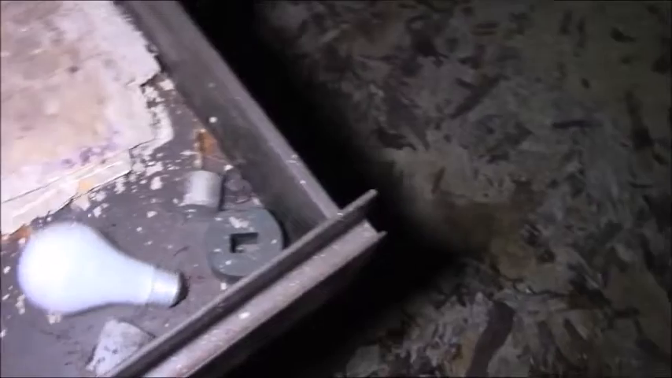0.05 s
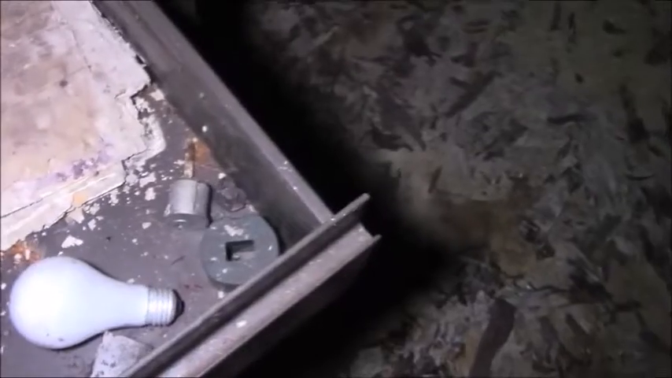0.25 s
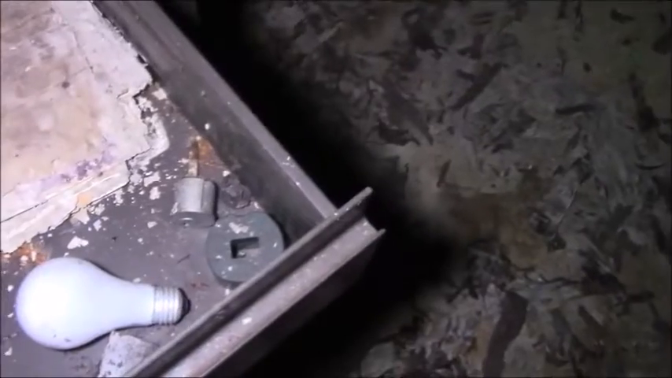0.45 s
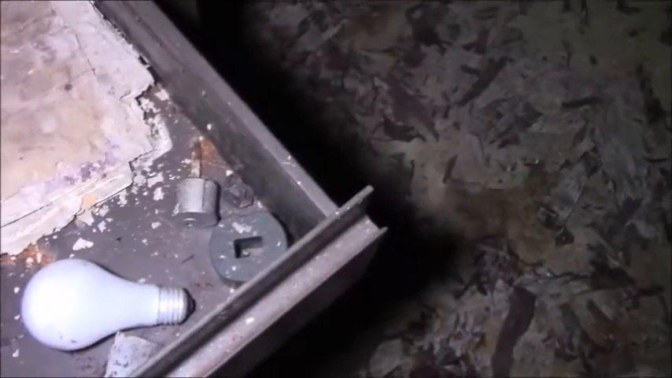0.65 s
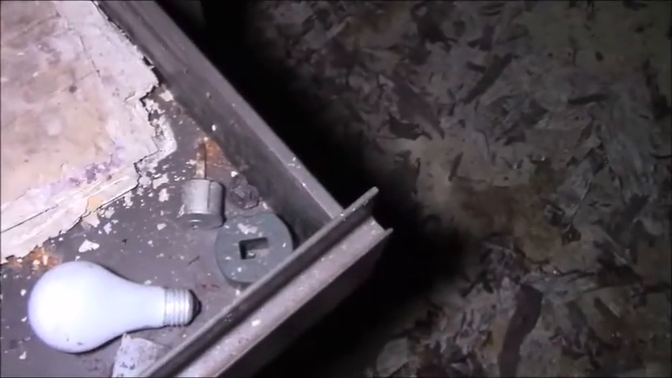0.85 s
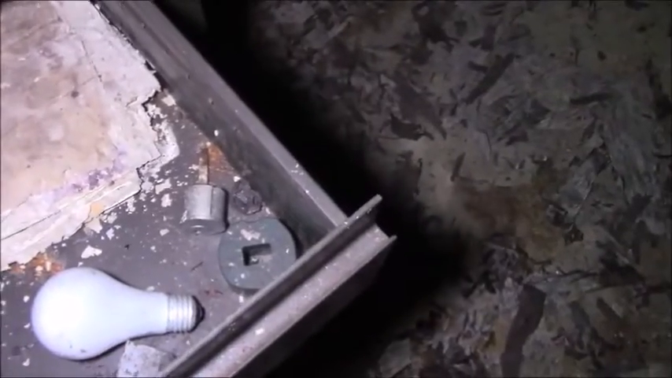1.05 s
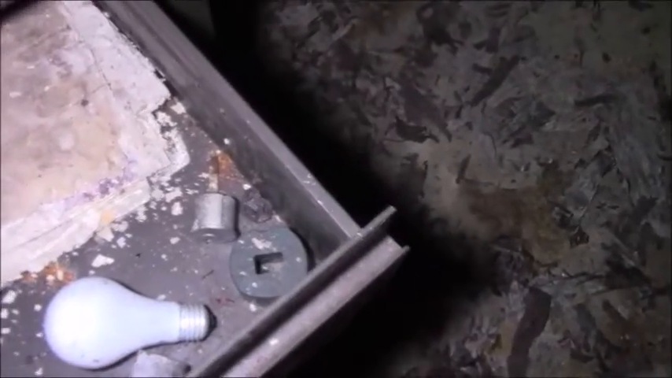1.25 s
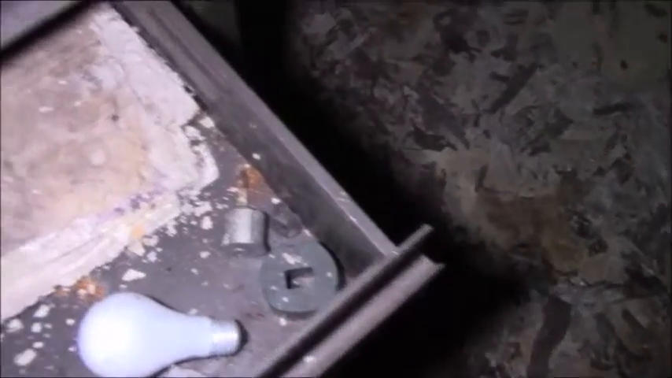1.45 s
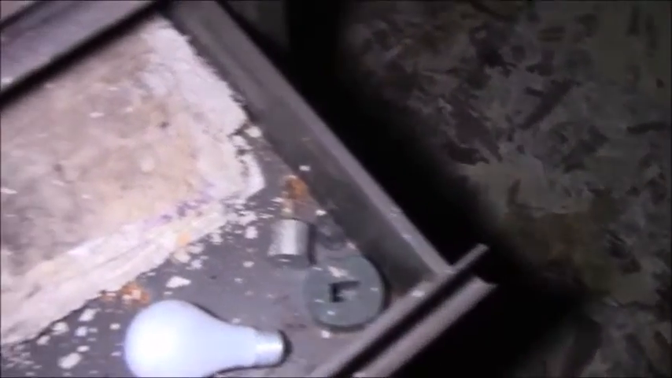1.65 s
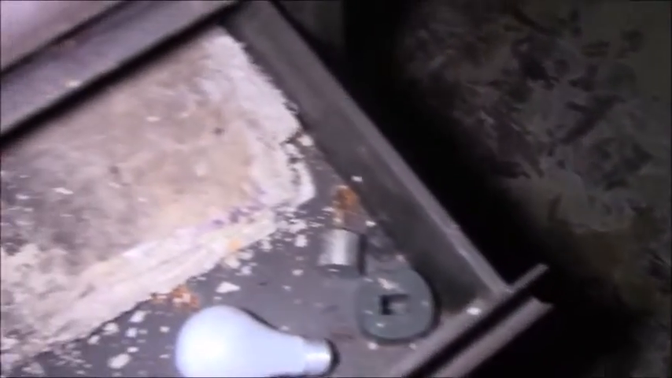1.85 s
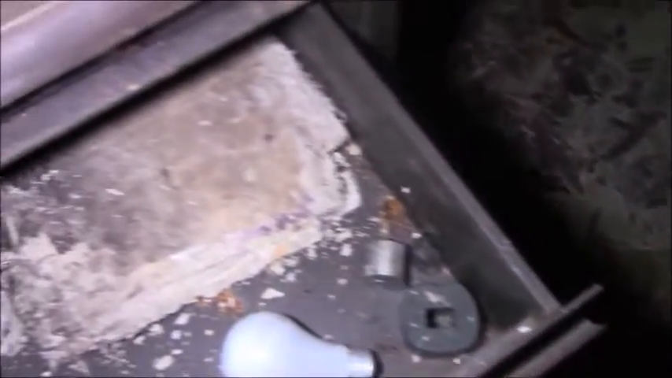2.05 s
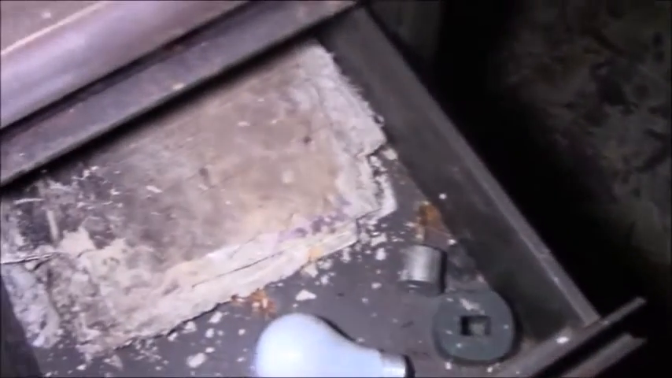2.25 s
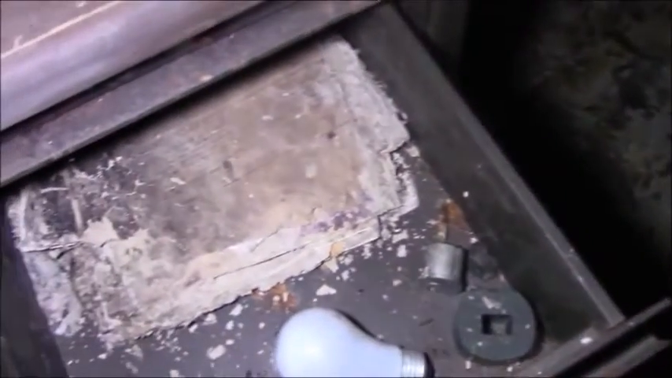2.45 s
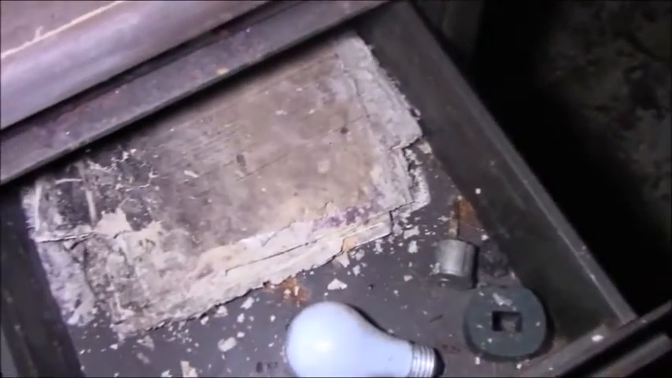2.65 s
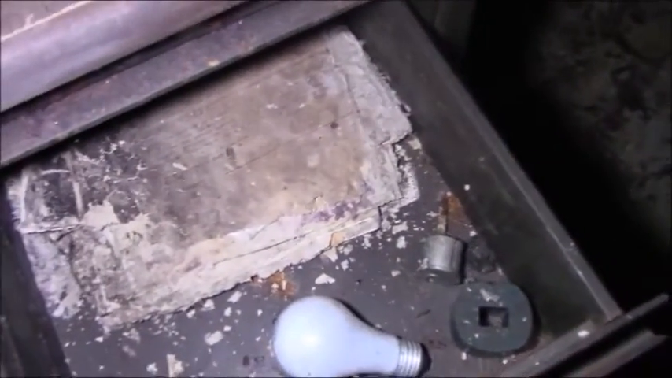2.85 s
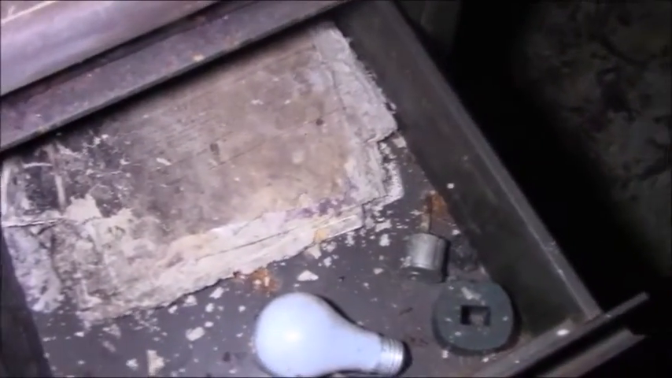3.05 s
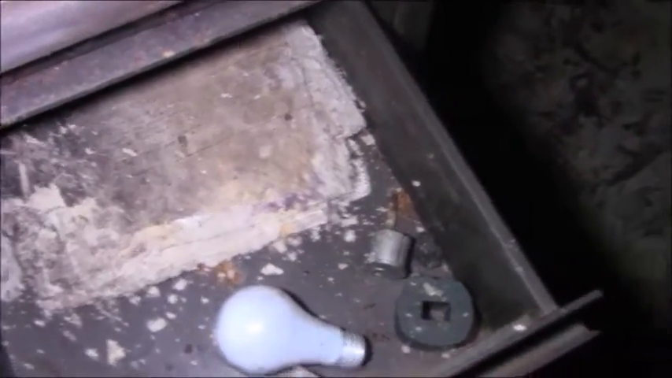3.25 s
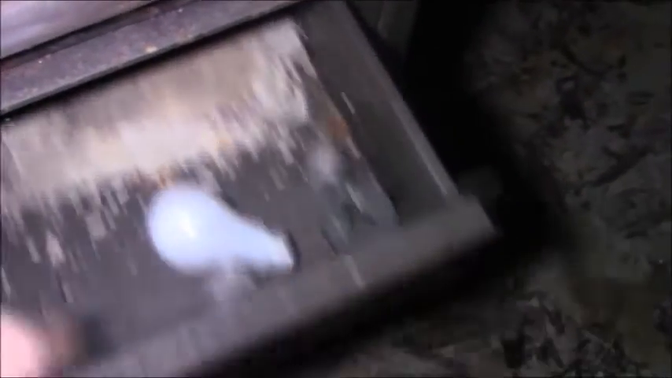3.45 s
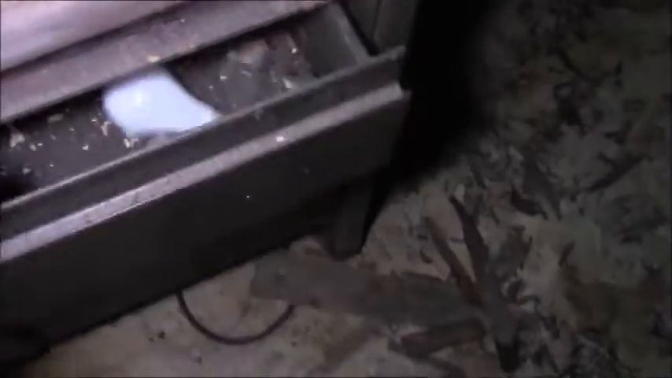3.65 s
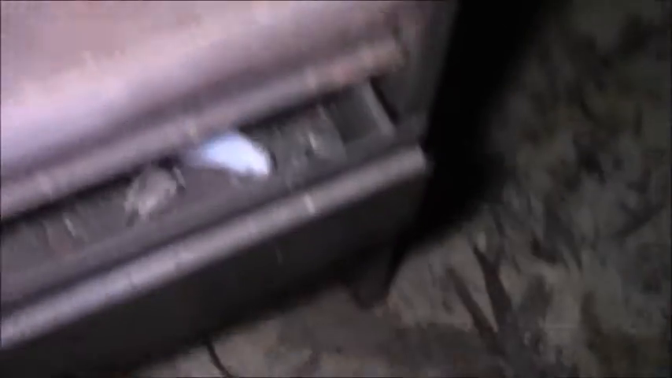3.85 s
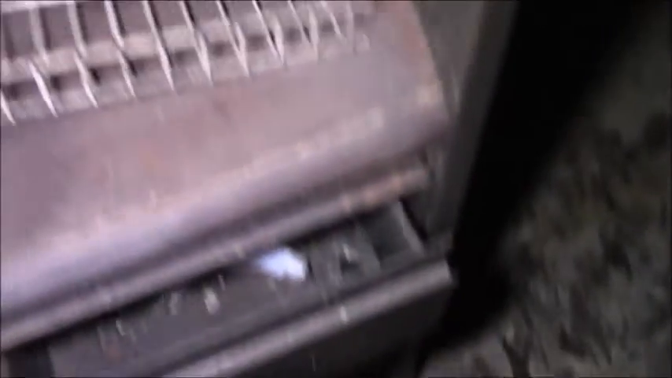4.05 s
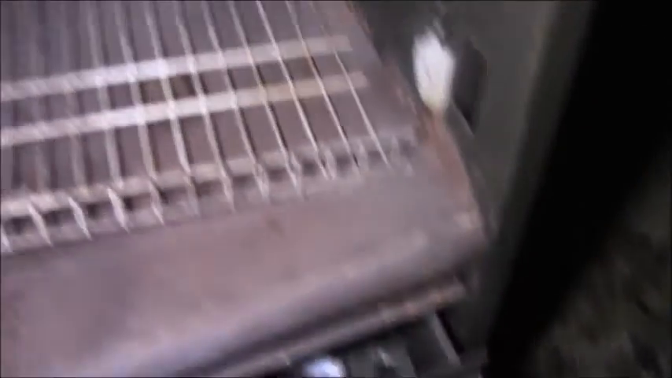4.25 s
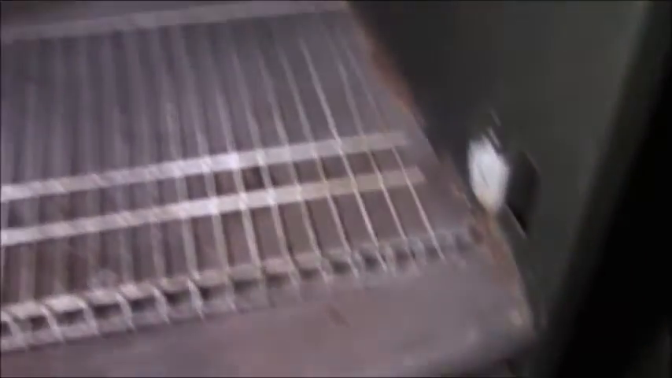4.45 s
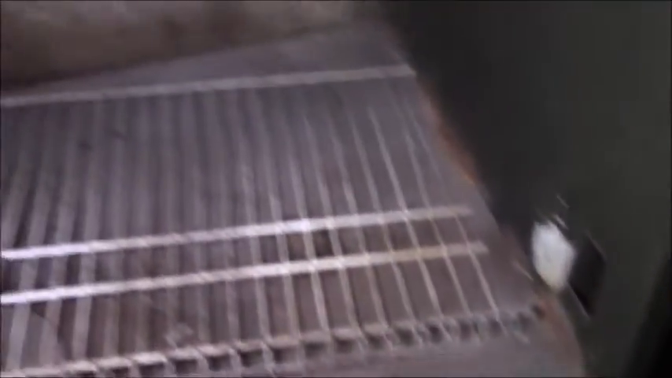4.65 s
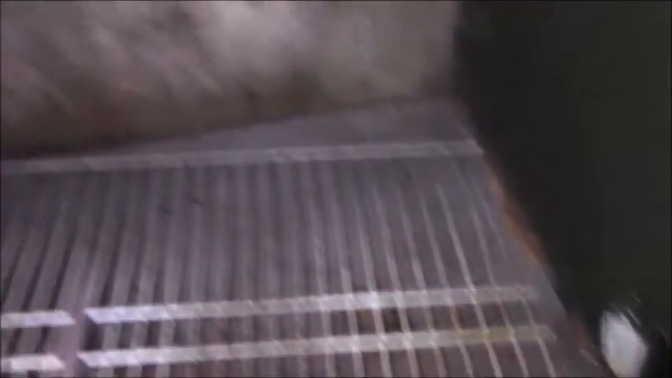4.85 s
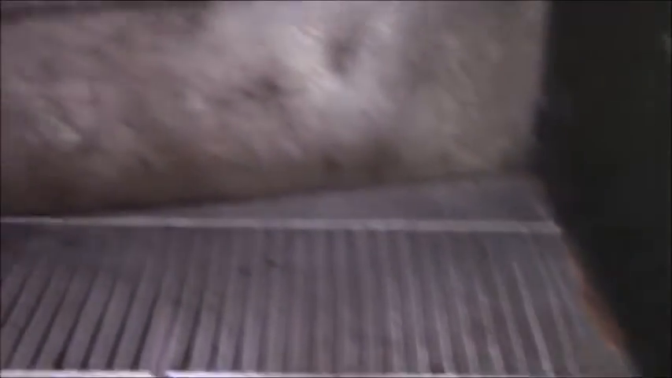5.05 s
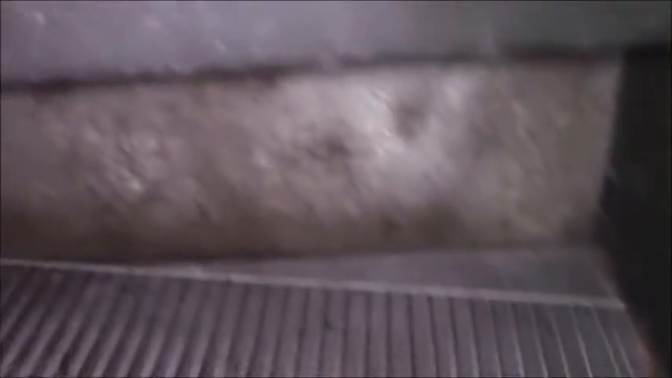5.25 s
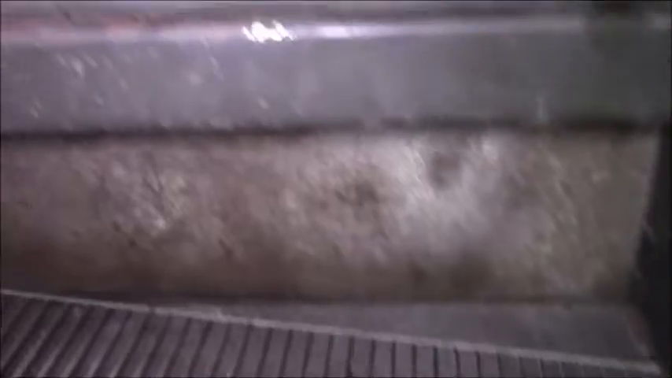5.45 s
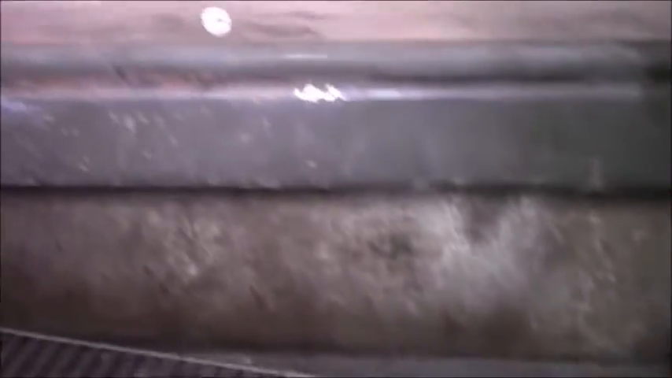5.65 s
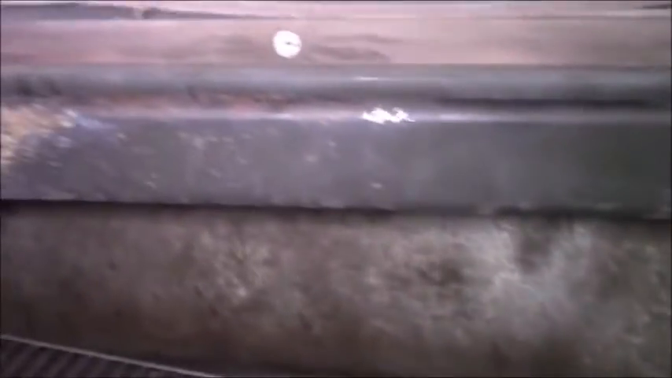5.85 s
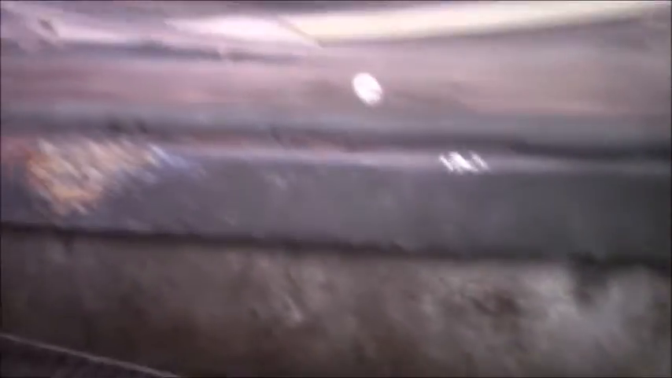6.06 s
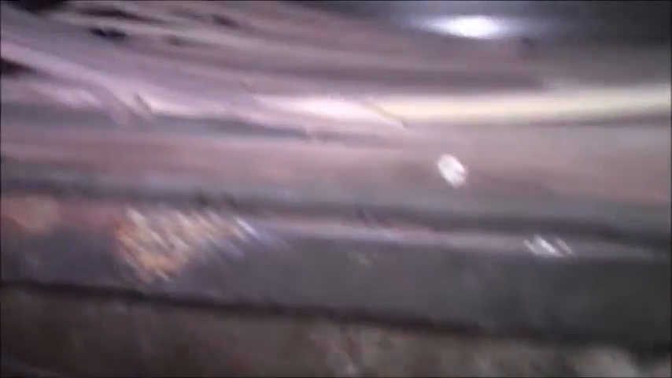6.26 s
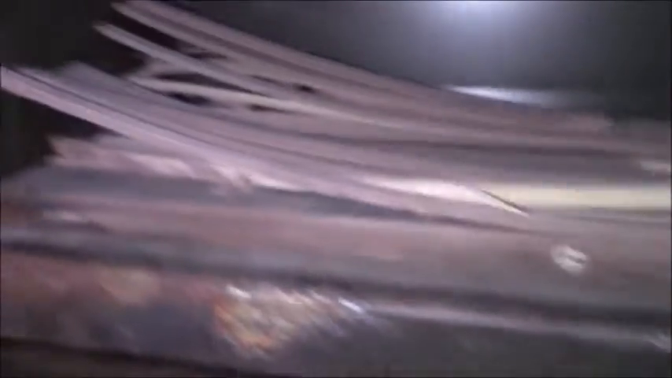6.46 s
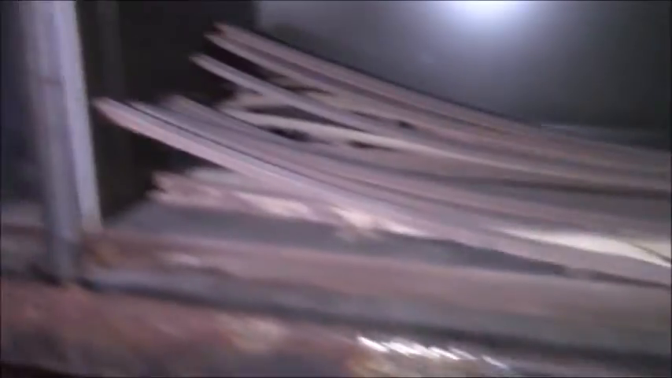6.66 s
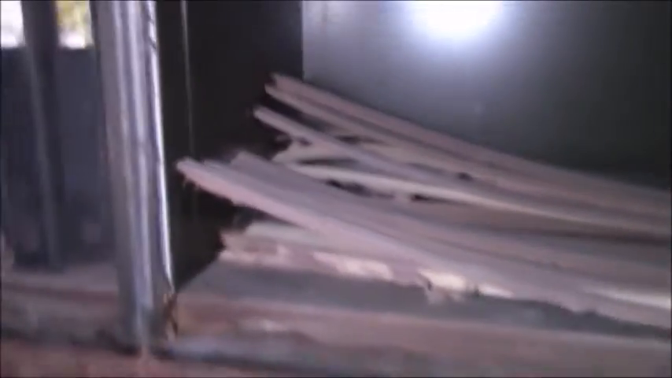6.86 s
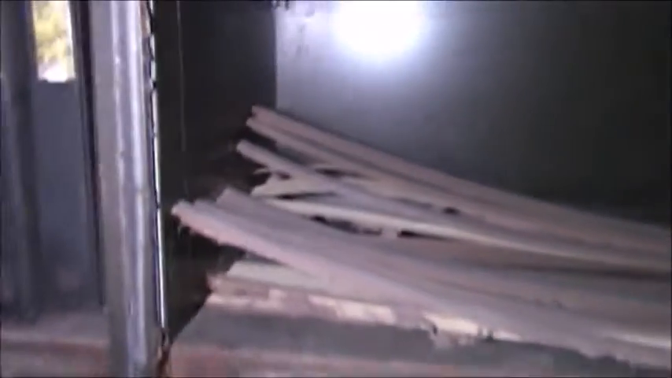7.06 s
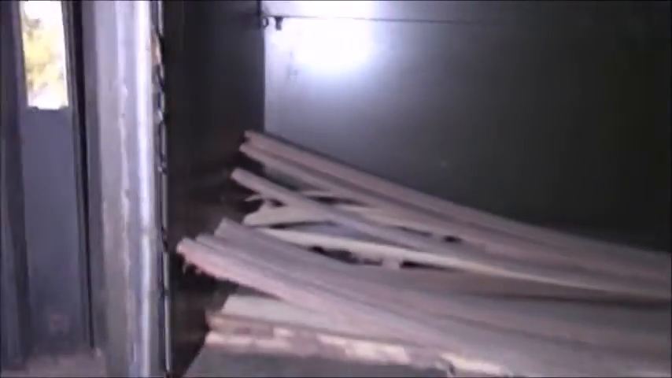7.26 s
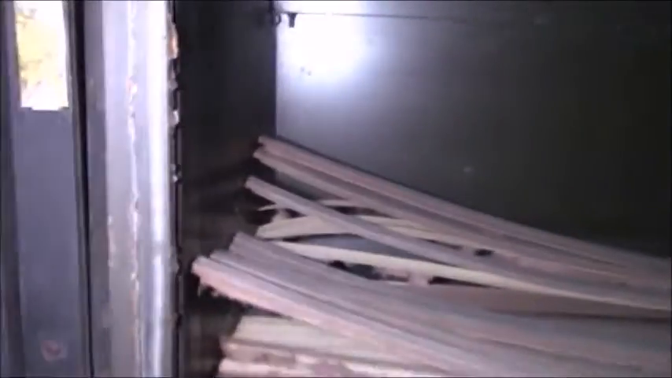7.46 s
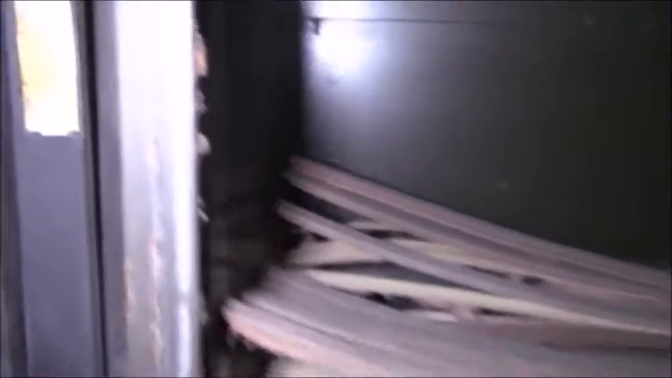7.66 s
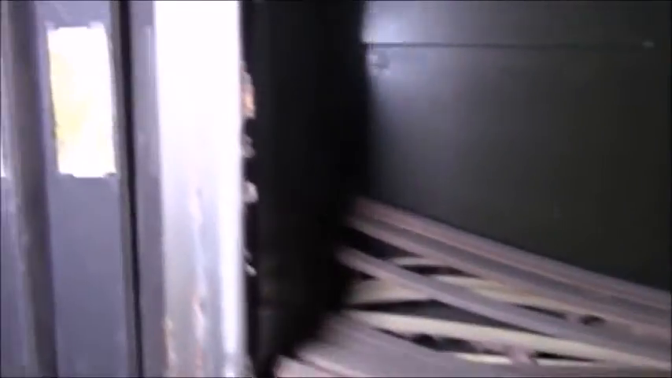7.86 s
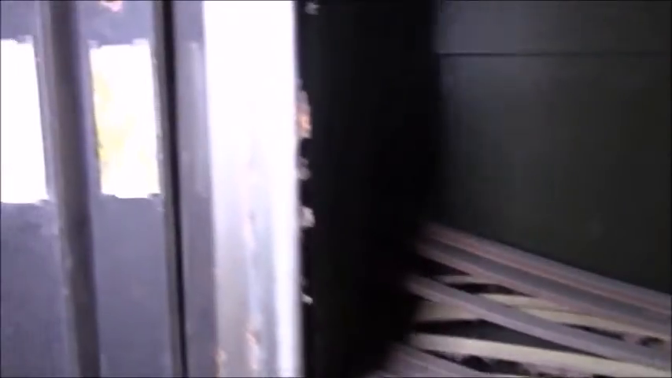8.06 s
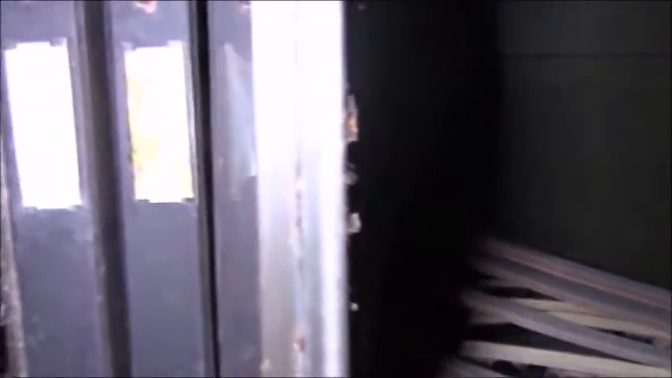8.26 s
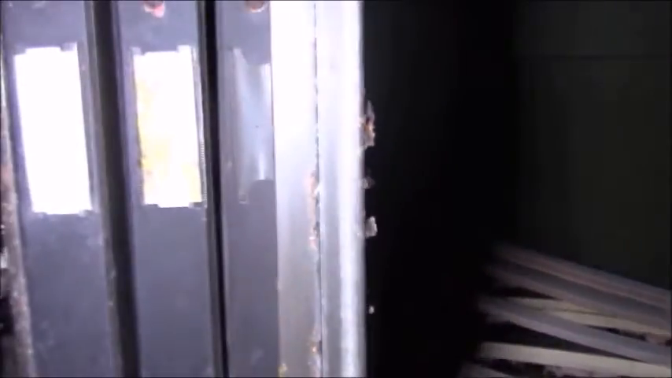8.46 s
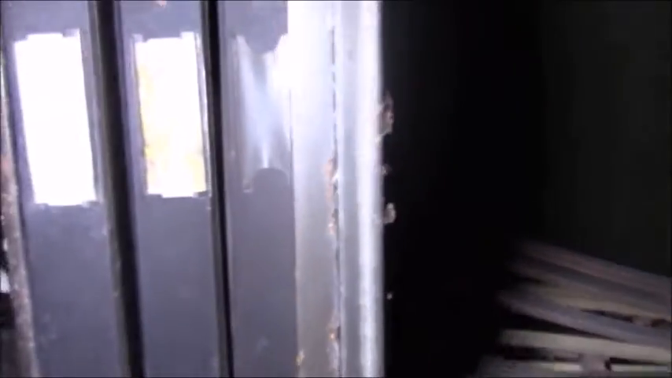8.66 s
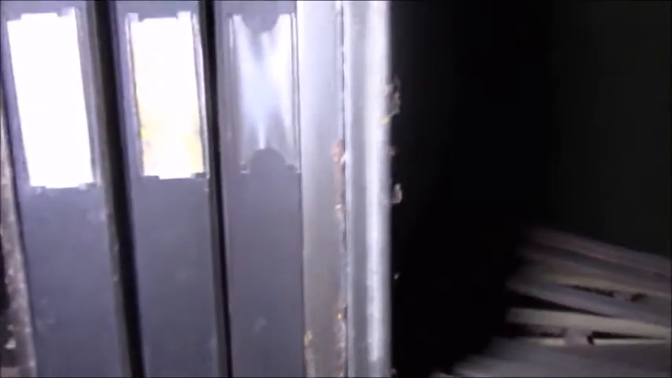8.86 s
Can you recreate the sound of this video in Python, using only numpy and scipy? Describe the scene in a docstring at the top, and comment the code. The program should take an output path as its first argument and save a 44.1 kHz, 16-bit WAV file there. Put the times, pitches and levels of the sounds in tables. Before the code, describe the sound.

In an empty, lightly reverberant workshop, old metal drawers are handled at close range: soft knocks first, then a loud grinding shove with clattering and a clink, sharp little ticks, and a second rough scrape. Shoes and clothing rustle over gritty floor. A steel door scrapes along and slams with a low boom and quick rebound, leaving shuffling and a final grit snap over steady hush.

```python
"""A knock and a faint rub of rusty runners open the scene: drawers of a sheet-steel cabinet are worked close
by. Four strokes grind and the cabinet rocks on after one of them (random grains drive panel modes); drawers and
a shoe thump, a loose steel part clinks, a sliding door slams and rebounds (decaying modes and noise). Shoes and
clothes shuffle over a gritty floor (softer grains in swelling bands); thin squeaks (gliding sines), a dull
clack, a pinging wire and snapping grit (noise bursts) join them. An empty workshop adds its echo and room
noise; two faint steady high tones sound throughout."""
import sys
import numpy as np
from scipy import signal
from scipy.fft import rfft, irfft, next_fast_len
from scipy.io import wavfile
from scipy.ndimage import map_coordinates

SR = 44100
rng = np.random.default_rng(int(sys.argv[2]) if len(sys.argv) > 2 else 0)


def to_wav(sig):
    """Store sig (one row per channel, or 1-D mono) as 16-bit WAV at the path in sys.argv[1].

    Samples outside -1..1 are clipped; the rate is SR.
    """
    pcm = np.clip(np.atleast_2d(sig), -1, 1) * 32767
    pcm = np.round(pcm).astype(np.int16)
    wavfile.write(sys.argv[1], SR, pcm.T)  # frames by channels


N = 392490
TIME = np.arange(N) / SR
RUB_SIZE = int(1.4 * SR)   # samples in one stroke or rocking spell
# low, middle and high parts of a rub or knock: [lower edge f/Hz, upper edge f/Hz]
BANDS = [(62, 500), (500, 3000), (3000, 17000)]
# cabinet panel modes: [f/Hz, relative level/dB, t60/s]
PANEL_MODES = [(93, -9.5, 0.66), (105.8, -11.5, 0.32), (133.7, -8, 0.27), (141, -28.5, 0.284),
               (168.5, -7.5, 0.29), (197.6, -2, 0.26), (242.6, -3, 0.21), (259.8, 3.5, 0.22),
               (304.1, 3, 0.18), (334, -18, 0.39), (356.7, -1.5, 0.27), (400.5, -1.5, 0.24),
               (434, -3.5, 0.19), (502, -7.5, 0.21), (546, -18, 0.51), (624, -5, 0.34), (689, -15.5, 0.44),
               (758, -4, 0.22), (825, -15.5, 0.22), (894, -9.5, 0.28), (1110, -14, 0.16), (1350, -19, 0.15),
               (1394, -15.5, 0.11), (1725, -28.5, 0.08)]


def from_db(db):
    """Level definition: a gain is ten to the power of dB / 20."""
    return 10 ** (np.asarray(db) / 20)


def rms_one(x):
    """Normalization of the mean square: scale to unit rms."""
    return x / np.sqrt(np.mean(x ** 2) + 1e-20)


def at_hz(points, hz):
    """Interpolation along logarithmic frequency, on which pitch is even."""
    known_hz, values = np.transpose(points)
    return np.interp(np.log(hz + 1e-9), np.log(known_hz), values)


def colour(x, spectrum):
    """Linear filtering: multiply the signal's spectrum by a gain table."""
    size = next_fast_len(len(x))
    gain = from_db(at_hz(spectrum, np.fft.rfftfreq(size, 1 / SR)))
    return irfft(rfft(x, size) * gain, size)[:len(x)]


def band(x, low_hz, high_hz, order=3):
    """Causal Butterworth band-pass, flat between its edges."""
    sections = signal.butter(order, [low_hz, high_hz], "band", fs=SR, output="sos")
    return signal.sosfilt(sections, x)


def drift(rate, size):
    """Slow random modulation of unit rms: `rate` random values per second, joined by straight lines."""
    steps = np.arange(size) * rate / SR
    knots = np.arange(int(steps[-1]) + 2)
    return rms_one(np.interp(steps, knots, rng.standard_normal(len(knots))))


def dying(t60):
    """Exponential decay for one second, losing 60 dB in t60 seconds."""
    return from_db(-60 * TIME[:SR] / t60)


def add(out, s, sound):
    """Superposition: mix a sound in at a time in seconds."""
    at = round(s * SR)
    out[at:at + len(sound)] += sound[:N - at]


def ring(modes, scatter_db=0):
    """Modal superposition: one second of decaying sines; neighbouring modes start in opposite directions."""
    chance = from_db(scatter_db * rng.standard_normal(len(modes)))
    out = np.zeros(SR)
    for k, (hz, db, t60) in enumerate(modes):
        amplitude = (-1) ** k * chance[k] * from_db(db)
        out += amplitude * dying(t60) * np.sin(2 * np.pi * hz * TIME[:SR])
    return out


def struck(blows, modes):
    """Impact excitation: each blow rings all modes; positive brightness favours the upper ones."""
    out = np.zeros(N)
    lowest_hz = modes[0][0]
    for s, blow_db, brightness_db in blows:
        blow_modes = [(hz, db + blow_db + brightness_db * np.log2(hz / lowest_hz), t60)
                      for hz, db, t60 in modes]
        add(out, s, ring(blow_modes))
    return out


def friction(size, grains_per_s, spread_db, judder_rate, judder_db):
    """Dry friction as shot noise: grains of uneven size break at random under a wandering contact force."""
    chance, direction, rarity = rng.random((3, size))
    breaks = chance < grains_per_s / SR
    grain_size = from_db(spread_db * np.minimum(-np.log(rarity + 1e-9), 4))
    grains = breaks * np.sign(direction - .5) * grain_size
    return rms_one(grains * from_db(judder_db * drift(judder_rate, size)))


def body(force, share, t60, shift):
    """Dense modal response: noise decay stands for a large surface's modes, which wander with the contact."""
    crowd = rng.standard_normal(SR) * dying(t60)
    shaken = signal.fftconvolve(force, crowd / np.linalg.norm(crowd))[:len(force)]
    travel = np.cumsum(1 + shift * drift(9, len(force)))   # uneven reading speed bends the pitch
    return force + share * map_coordinates(shaken, [travel], order=3, mode="mirror")


def play(levels_db, sound, fade_s):
    """Band-wise modulation: low, middle and high parts follow their own levels."""
    t = TIME[:len(sound)]
    gate = np.clip(np.minimum(t, t[-1] - t) / fade_s, 0, 1)
    return gate * sum(from_db(db) * rms_one(band(sound, *edges)) for db, edges in zip(levels_db, BANDS))


def air(level_db=-58.5, side_db=-7.5):
    """Diffuse background: independent mid and side noise make a wide, steady hush, with two faint high tones."""
    # spectrum of the room noise: [f/Hz, relative level per Hz/dB]
    hush_spectrum = [(15, -63.5), (25, -22), (151, -15), (197, -7), (250, -7), (1360, -15), (3350, -23),
                     (4370, -23.5), (6500, -26), (7610, -29), (8240, -28.5), (14000, -37.5)]
    # faint steady tones: [f/Hz, rms level/dB]
    whine_tones = [(7499, -75), (15003, -74)]
    mid, side = (rms_one(colour(noise, hush_spectrum)) for noise in rng.standard_normal((2, N)))
    whine = sum(np.sqrt(2) * from_db(db) * np.sin(2 * np.pi * hz * TIME) for hz, db in whine_tones)
    return from_db(level_db) * (mid + from_db(side_db) * np.array([side, -side])) + whine


def rub_levels(effort, response):
    """Driven response: boom, scrape and hiss follow the effort at their own slopes, then die at their own rates."""
    # decay rates after the last effort: [boom/(dB/s), scrape/(dB/s), hiss/(dB/s)]
    coast_rates = (107, 152, 222.5)
    scrape_follows, hiss_follows = 0.88, 1.06   # dB per dB of effort
    build_s, build_db = 0.062, 17.5   # the panels take this long to gain this much
    s, db = np.transpose(effort)
    boom_db, scrape_db, hiss_db, boom_follows = response
    t = s[0] + TIME[:RUB_SIZE]
    easing = np.interp(t, s, db) - db.max()   # dB below the greatest effort
    coasting = np.maximum(t - s[-1], 0)
    building = build_db * np.minimum((t - s[0]) / build_s - 1, 0)
    boom = boom_db + boom_follows * easing + building
    scrape = scrape_db + scrape_follows * easing
    hiss = hiss_db + hiss_follows * easing
    return [db.max() + level - rate * coasting for level, rate in zip((boom, scrape, hiss), coast_rates)]


def strokes_and_rocking(panel_db=2.5, level_db=-0.5):
    """Friction-driven resonance: rusty runners grind, or the cabinet rocks on, and the sheet steel answers."""
    # strength of the rubbing or rocking, one list per stroke or rocking spell (the third): [t/s, relative level/dB]
    efforts = [
        [(0.0, -62), (0.098, -54.5), (0.34, -58.5), (0.72, -57), (0.86, -61)],
        [(3.19, -58), (3.248, -36.5), (3.282, -46), (3.324, -39), (3.334, -32), (3.472, -28.5), (3.504, -29.5),
         (3.514, -23.5), (3.682, -33.5), (3.73, -49)],
        [(3.84, -48), (4.002, -56), (4.334, -54.5), (4.46, -54)],
        [(5.21, -37), (5.286, -52), (5.404, -24.5), (5.464, -24.5), (5.576, -43.5), (5.694, -23.5),
         (5.732, -26), (5.738, -22), (5.784, -37.5), (5.8, -40.5)],
        [(7.2, -61), (7.356, -47.5), (7.418, -36), (7.428, -28), (7.44, -34.5), (7.542, -30), (7.548, -25.5),
         (7.57, -34.5), (7.706, -37), (7.735, -38)],
    ]
    # the steel's answer, one row per spell: [boom/dB, scrape/dB, hiss/dB at full effort, boom slope/(dB/dB)]
    responses = [(9.5, 6, -4.5, 2.2), (3, 4.5, -2, 0.6), (13.5, 4.5, -3.5, 1), (1, 5, -1, 0.32),
                 (3.5, 4.5, -2.5, 0.78)]
    # colour of each stroke or rocking spell, one list each: [f/Hz, relative level per Hz/dB]
    rub_colours = [
        [(24, -60), (40, -29.5), (81, -20), (345, -5), (467, -9), (896, -22), (1680, -22), (3300, -26),
         (4130, -24), (4800, -24), (14800, -37), (16000, -44)],
        [(24, -62), (40, -40), (85, -12.5), (163, -12.5), (194, -2.5), (297, -5.5), (345, -9), (600, -3),
         (770, -14.5), (852, -7), (1810, -9.5), (4680, -25.5), (7930, -21.5), (14500, -33.5), (16000, -35)],
        [(24, -52), (40, -36), (104, -10), (147, -9.5), (204, 4), (491, -19.5), (896, -18), (1370, -24),
         (1720, -22), (2320, -29), (7360, -30), (16000, -43)],
        [(24, -61), (40, -24), (81, -15.5), (171, -11), (262, 2.5), (529, -8), (570, -9), (663, -5.5),
         (733, -2.5), (1720, -10), (3650, -28), (5180, -25), (7360, -32.5), (13800, -36.5), (16000, -46)],
        [(24, -64), (40, -36), (124, -6), (163, -5.5), (256, -1.5), (320, 0), (697, -9.5), (1180, -12),
         (1340, -11), (2260, -18), (2570, -12), (3060, -22.5), (3300, -20), (7930, -33.5), (16000, -48)],
    ]
    out, panels = np.zeros(N), ring(PANEL_MODES)
    panels = from_db(panel_db) * panels / np.abs(rfft(panels)).max()   # strongest resonance has this gain
    for effort, response, spectrum in zip(efforts, responses, rub_colours):
        force = friction(RUB_SIZE, grains_per_s=7000, spread_db=3.0, judder_rate=199.35, judder_db=2.0)
        sheet = body(force, share=0.97, t60=0.098, shift=.012)
        boom = signal.fftconvolve(force, panels)[:len(force)]
        rub = colour(sheet + boom, spectrum)
        add(out, effort[0][0], play(rub_levels(effort, response), rub, fade_s=.02))
    return from_db(level_db) * out


def knocks(panel_db=-11.5, thud_db=1.0, thud_life=0.94, clang_db=2.0, seat_db=-1.5):
    """Impact response: panel modes ring under a thud, a dense clang and a short bright crunch.
    With slack, clang and crunch come first, then the thump and, if slack enough, a second clang."""
    # knocks of drawers, a shoe thump (1.148) and the door's rebound (7.8):
    # [t/s, thump/dB, clang/dB, crunch/dB (all relative), clang t60/s, slack from catching to seating/s]
    knock_times = [(.001, -27.5, -34.5, -50, 0.23, 0), (.149, -25.5, -31.5, -39, 0.079, 0.015),
                   (0.559, -35, -60, -64, .1, 0.00067), (.583, -38, -52, -62.5, 0.16, 0),
                   (1.148, -44.5, -56, -67, 0.066, 0.00035), (3.038, -67.5, -41.5, -42.5, .052, 0.0021),
                   (3.069, -60, -39, -43, 0.12, 0.0039), (3.081, -48.5, -28, -29.5, 0.06, 0.0009),
                   (3.242, -19.5, -31.5, -34, .05, 0.02), (3.334, -24, -27.5, -38, 0.095, 0.0023),
                   (3.511, -30, -34, -28, .1, 0), (3.69, -20.5, -38, -58, .09, 0.0017),
                   (3.758, -24, -12.5, -22, 0.016, 0.0072), (3.797, -24, -31, -53, .15, 0.0012),
                   (3.896, -40, -34.5, -36, 0.084, 0.0032), (4.041, -34, -38, -41.5, 0.11, .022),
                   (4.203, -39, -33, -37, 0.15, 0.028), (4.33, -30, -32.5, -41.5, 0.14, 0.022),
                   (5.122, -58, -46, -43.5, .072, 0.005), (5.15, -53, -45.5, -39.5, 0.17, 0.00057),
                   (5.197, -18, -28.5, -35.5, .15, 0.013), (5.738, -21, -17.5, -25, 0.1, 0.0053),
                   (6.172, -31, -48, -40, 0.095, 0.0049), (6.558, -61, -35.5, -60, 0.049, 0),
                   (6.696, -34.5, -39, -57, 0.057, 0.0006), (7.757, -12, -19, -22.5, 0.14, 0.0028),
                   (7.8, -22, -28.5, -38.5, 0.37, 0.00068)]
    # spectrum of the crowded modes: [f/Hz, relative level per Hz/dB]
    clang_spectrum = [(30, -43), (70, -18), (130, -10.5), (300, 10.5), (520, -6), (830, -1.5), (1070, -6.5),
                      (1300, -8.5), (1750, -7), (3400, -18.5), (5000, -20), (13000, -31.5), (16000, -44)]
    out = np.zeros(N)
    for s, thump, clang, crunch, t60, slack_s in knock_times:
        force = friction(SR, grains_per_s=16000, spread_db=2.0, judder_rate=315.4, judder_db=2.0)
        crowd = colour(force, clang_spectrum)
        low, middle, high = (rms_one(band(crowd, *edges)) for edges in BANDS)
        panels = from_db(panel_db) * ring(PANEL_MODES, scatter_db=4.5)
        thud = from_db(thud_db) * low * dying(t60 * thud_life)
        add(out, s + slack_s, from_db(thump) * (panels + thud))
        add(out, s, from_db(clang + clang_db) * middle * dying(t60))
        add(out, s, from_db(crunch) * high * dying(t60))
        if slack_s > .003:   # long enough for a second clang; reversed noise makes it differ
            add(out, s + slack_s, from_db(clang + seat_db) * middle[::-1] * dying(t60))
    return out


def steel_part():
    """Modal ringing of a loose steel part in the drawer, with two close modes beating."""
    # blows: [t/s, relative level/dB, brightness/(dB/octave)]
    blows = [(.149, -27, 8), (.166, -36, 8.5), (3.759, -1.5, 0.5)]
    # modes: [f/Hz, relative level/dB, t60/s]
    modes = [(1960, -23.5, 0.17), (2148.5, 0.5, 0.11), (2156, -0.5, 0.11), (2214, 1.5, 0.011),
             (2960, -43, 0.98), (3217, -21, 0.14), (3660, -36, .07), (5140, -26, 0.23),
             (6570, -19.5, 0.066), (7250, -32, 0.14), (8400, -33, 0.14), (10800, -49.5, 0.072)]
    return struck(blows, modes)


def squeaks(arch_hz=130, waver_hz=35):
    """Frequency modulation: each faint squeak swells and fades along an arched, unsteady glide."""
    # squeaks: [t/s, length/s, start f/Hz, end f/Hz, peak level/dB]
    glides = [(.19, 0.13, 4300, 3990, -59), (.56, 0.056, 3980, 4080, -57), (.78, 0.13, 4100, 3920, -60)]
    out = np.zeros(N)
    for s, length, start_hz, end_hz, db in glides:
        size = int(length * SR)
        arch = np.sin(np.linspace(0, np.pi, size))
        hz = np.linspace(start_hz, end_hz, size) + arch_hz * arch + waver_hz * drift(177, size)
        add(out, s, from_db(db) * arch * np.sin(2 * np.pi * np.cumsum(hz) / SR))
    return out


def shuffles(swell_db=19.5, tread_db=-4.5, rustle_db=-6.5):
    """Soft friction: fine grains of soles and cloth swell and fade, some through a hollow resonance."""
    # moves: [peak t/s, rise/s, fall/s, level/dB, brightness/dB (low for a sole, high for cloth)]
    moves = [(1.31, .27, .3, -49, -7), (1.65, .27, 0.26, -51, -1), (2.76, 0.13, 0.46, -59, 1),
             (3.02, 0.24, 0.49, -48, 1), (4.93, 0.097, 0.23, -56.5, 0), (5.06, 0.092, 0.1, -52, 9.5),
             (6.02, 0.37, 0.47, -47.5, 5), (6.25, 0.19, 0.53, -52, 3), (6.485, .025, 0.33, -45.5, 2.5),
             (6.57, 0.096, 0.23, -38, -6), (6.70, 0.21, 0.17, -38.5, -5.5), (6.9, .3, .3, -55.5, 6.5),
             (7.07, .2, 0.13, -50.5, 11), (8.02, .15, 0.29, -47.5, 4), (8.21, 0.083, 0.26, -48, 2.5),
             (8.39, 0.23, 0.67, -55.5, 3), (8.67, 0.46, 0.26, -55, 5), (8.86, 0.21, 0.6, -41.5, 2)]
    # spectrum of the scuff: [f/Hz, relative level per Hz/dB]
    scuff_spectrum = [(24, -63), (40, -33.5), (231, -6.5), (276, -8.5), (422, -7), (479, -10), (751, -11),
                      (918, -12), (1070, -13), (1340, -10.5), (6820, -23.5), (14800, -37), (16000, -49.5)]
    # hollow note of moves peaking within a span: [from t/s, until t/s, f/Hz, bandwidth/Hz, gain/dB]
    hollow_notes = [(1.0, 1.5, 865, 447, 8.5), (2.5, 3.2, 467, 60, 5), (6.4, 6.8, 940, 420, 6)]
    out = np.zeros(N)
    for peak_s, rise_s, fall_s, db, brightness_db in moves:
        force = friction(SR, grains_per_s=12000, spread_db=4.5, judder_rate=79.7, judder_db=1.0)
        sound = colour(body(force, share=1.0, t60=0.066, shift=.03), scuff_spectrum)
        for from_s, until_s, note_hz, width_hz, note_db in hollow_notes:
            if from_s < peak_s < until_s:
                resonance = signal.iirpeak(note_hz, note_hz / width_hz, fs=SR)
                sound = sound + from_db(note_db) * signal.lfilter(*resonance, sound)
        t = TIME[:SR] - rise_s
        scuff = db - swell_db * np.maximum(-t / rise_s, t / fall_s)   # gains swell_db per rise, loses it per fall
        tread = scuff + tread_db - brightness_db
        rustle = scuff + rustle_db + brightness_db
        add(out, peak_s - rise_s, play((tread, scuff, rustle), sound, fade_s=0.019))
    return out


def clack():
    """Heavily damped modes: a dull clack from two blows in quick succession."""
    # blows: [t/s, relative level/dB, brightness/(dB/octave)]
    blows = [(2.4125, -10.5, 0), (2.4155, 0, 0)]
    # modes: [f/Hz, relative level/dB, t60/s]
    modes = [(483, -27, 0.047), (762, -29.5, 0.06), (950, -32.5, 0.038), (1170, -27.5, 0.049),
             (1487, -24.5, 0.043), (1650, -22, 0.019), (1870, -32.5, 0.069), (2460, -29, 0.014)]
    return struck(blows, modes)


def wire():
    """Modal ringing of a thin wire: a few very high modes ping."""
    # blows: [t/s, relative level/dB, brightness/(dB/octave)]
    blows = [(4.502, 5, 0.0013), (4.578, 5, 0)]
    # modes: [f/Hz, relative level/dB, t60/s]
    modes = [(9071, -61, 0.25), (9150, -53, 0.045), (9588, -67, 0.51)]
    return struck(blows, modes)


def ticks(spread=1.44):
    """Transient noise: grit snapping underfoot and small ticks are broad bands decaying at once."""
    # snaps: [t/s, level/dB, centre f/Hz, t60/s]
    snaps = [(4.503, -17, 6860, 0.0045), (4.578, -23, 5100, 0.0034), (4.616, -34, 4930, 0.0048),
             (4.679, -48.5, 2000, .04), (4.694, -34.5, 1950, 0.017), (4.727, -55, 2300, 0.046),
             (4.766, -51, 2040, 0.046), (4.969, -46, 5830, 0.0085), (6.473, -43.5, 7300, .05),
             (6.763, -39, 6140, 0.13), (6.924, -42.5, 5900, 0.069), (8.878, -25, 4200, 0.0071)]
    out = np.zeros(N)
    for s, db, hz, t60 in snaps:
        noise = band(rng.standard_normal(SR), hz / spread, hz * spread, order=2)
        add(out, s, from_db(db) * rms_one(noise) * dying(t60))
    return out


def door_slam():
    """Impact excitation: the steel door of the upper compartment hits its stop and its low modes ring."""
    # blows: [t/s, relative level/dB, brightness/(dB/octave)]
    blows = [(7.762, -1.5, 0.0046)]
    # modes: [f/Hz, relative level/dB, t60/s]
    modes = [(92.4, -31.5, 1), (173.6, -23.5, 0.34), (200, -23.5, 0.43), (252, -17.5, 0.29),
             (331.4, -22.5, 0.74), (355, -9.5, 0.23), (388, -21, 0.18), (504, -39, 0.44),
             (712, -25.5, 0.33), (808.5, -20, 0.22), (1050, -16, 0.1)]
    return struck(blows, modes)


def workshop(x, wet_db, delay_s=0.0037):
    """Diffuse reverberation: bands of decaying noise form the bare room's echo, dying faster in the treble."""
    # reverberation time of the room: [f/Hz, t60/s]
    room_t60 = [(100, 1), (300, 0.71), (1000, 0.49), (3000, 0.43), (8000, 0.28), (15000, 0.12)]
    edges = np.geomspace(50, 18000, 10)   # Hz
    tail = np.zeros(SR)
    for low, high in zip(edges, edges[1:]):
        tail += band(rng.standard_normal(SR), low, high) * dying(at_hz(room_t60, np.sqrt(low * high)))
    tail = tail * np.clip(TIME[:SR] / delay_s - .5, 0, 1)   # starts at half the delay, full at 1.5 times
    return x + from_db(wet_db) * signal.fftconvolve(x, tail / np.linalg.norm(tail))[:N]


def two_ports(mid, width, scatter, scatter_t60):
    """Mid-side stereo: two close microphone ports differ by a phase shift and scattered paths."""
    paths = rng.standard_normal(SR) * dying(scatter_t60) * (TIME[:SR] > .002)
    scattered = signal.fftconvolve(mid, paths / np.linalg.norm(paths))[:N]
    shifted = signal.hilbert(mid, next_fast_len(N))[:N].imag   # a quarter period
    side = colour(shifted + scatter * scattered, width) / np.hypot(1, scatter)
    return np.array([mid + side, mid - side])


def scene():
    """Superposition of near and far fields: the cabinet close by; feet, squeaks and a clack further off."""
    # stereo width of close sounds: [f/Hz, side minus mid level/dB]
    near_width = [(25, -27), (60, -48), (200, -55.5), (700, -29.5), (2000, -22), (4500, -13.5), (8000, -14),
                  (13000, -22)]
    # stereo width of more distant sounds: [f/Hz, side minus mid level/dB]
    far_width = [(200, -35.5), (700, -23.5), (2000, -16.5), (5000, -9.5), (13000, -10.5)]
    impacts = knocks() + door_slam()
    steel = band(strokes_and_rocking() + impacts, 51, 19000, order=2)   # no deep bass below about 50 Hz
    cabinet = workshop(steel, wet_db=-11.0)
    small_things = workshop(steel_part() + wire() + ticks(), wet_db=-16.0)
    further_off = workshop(clack(), wet_db=-10.5) + shuffles() + squeaks()
    near = two_ports(cabinet + small_things, near_width, scatter=1.7, scatter_t60=.04)
    far = two_ports(further_off, far_width, scatter=1.8, scatter_t60=.12)
    return near + far + air()


def record(dry, ceiling=.85, cutoff_hz=15900):
    """Saturation and band limiting: peaks bend smoothly under a ceiling, then a steep low-pass cuts the top."""
    held = dry / (1 + (dry / ceiling) ** 8) ** (1 / 8)
    return signal.sosfilt(signal.ellip(10, .1, 80, cutoff_hz, fs=SR, output="sos"), held)


dry = scene()
out = record(dry)
to_wav(out)
```